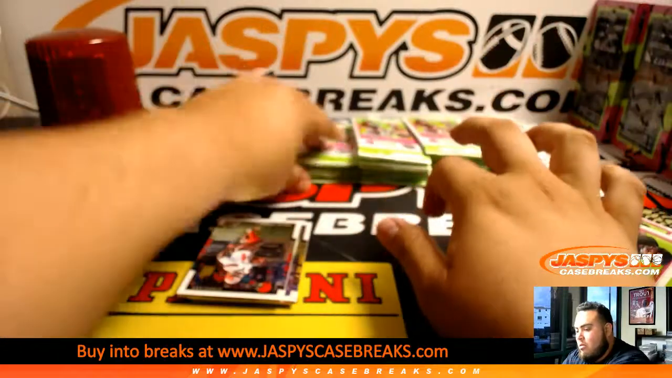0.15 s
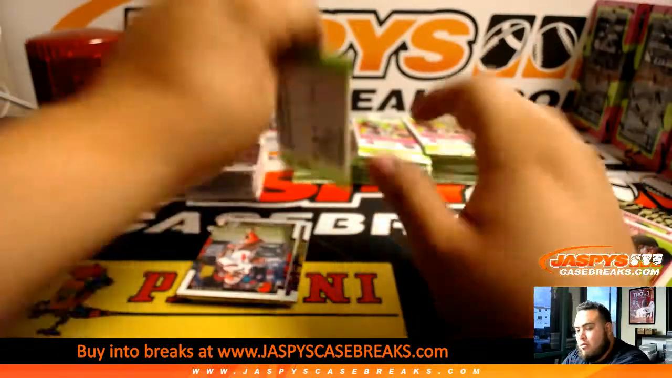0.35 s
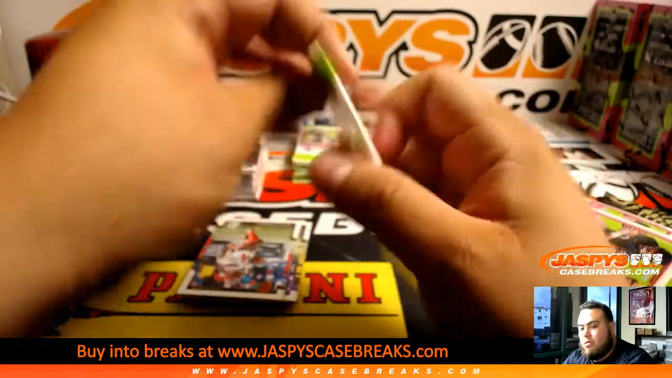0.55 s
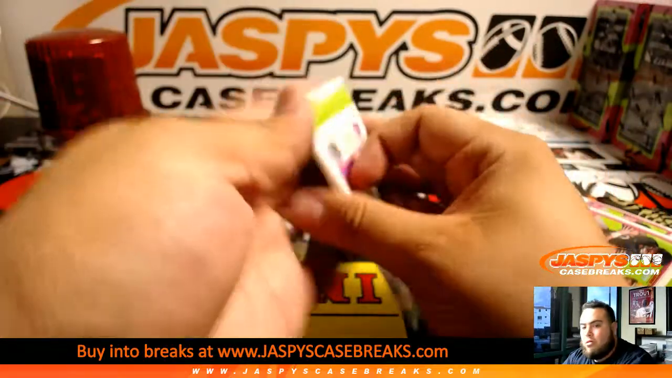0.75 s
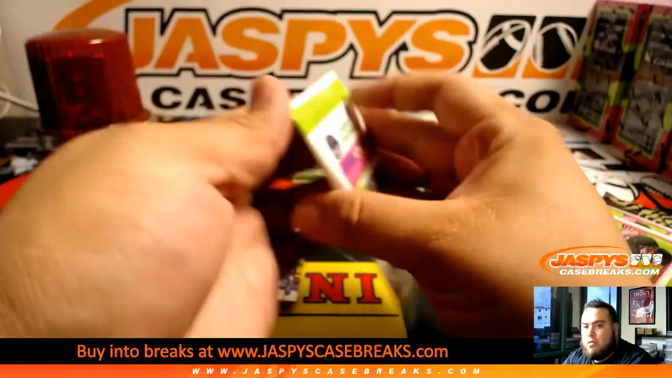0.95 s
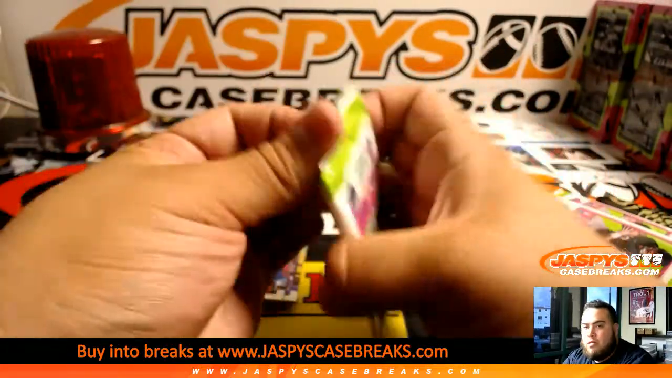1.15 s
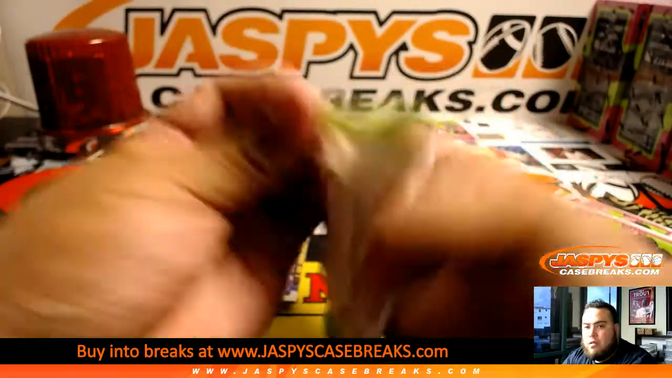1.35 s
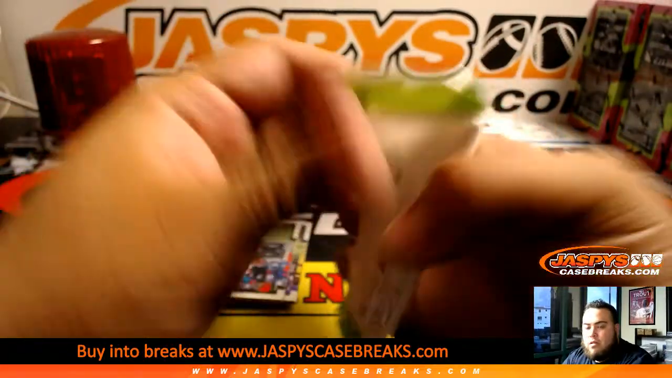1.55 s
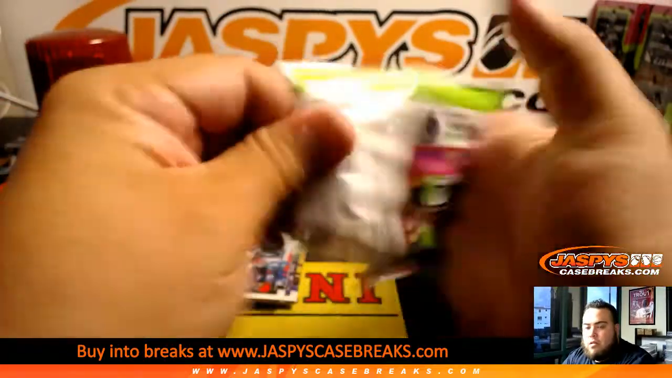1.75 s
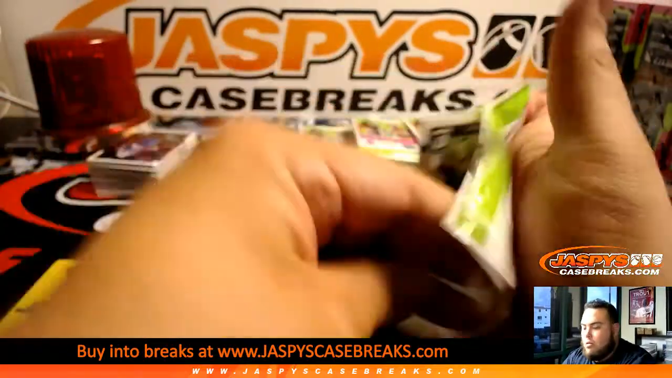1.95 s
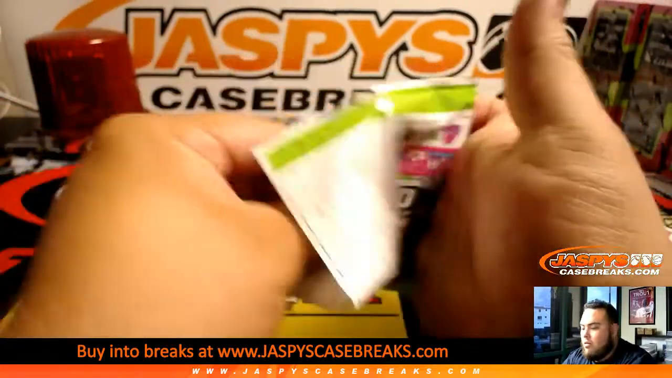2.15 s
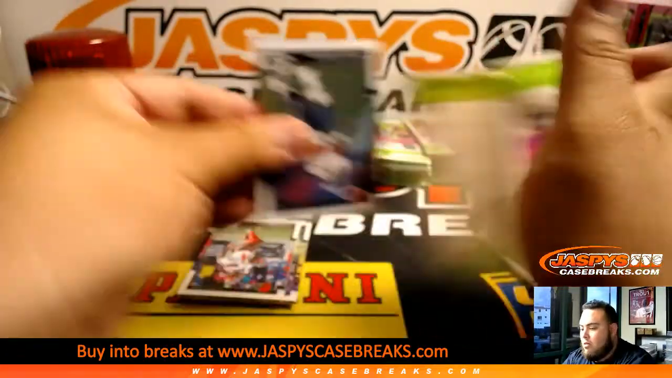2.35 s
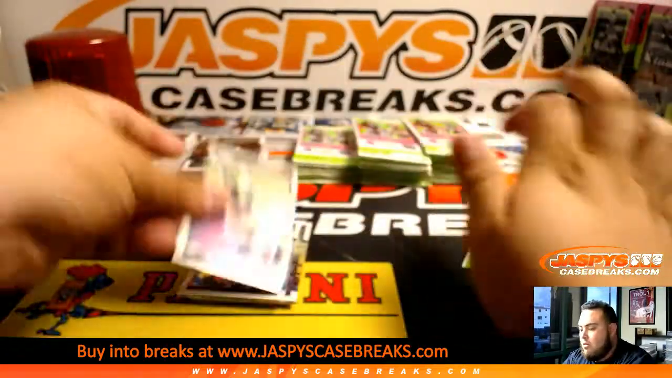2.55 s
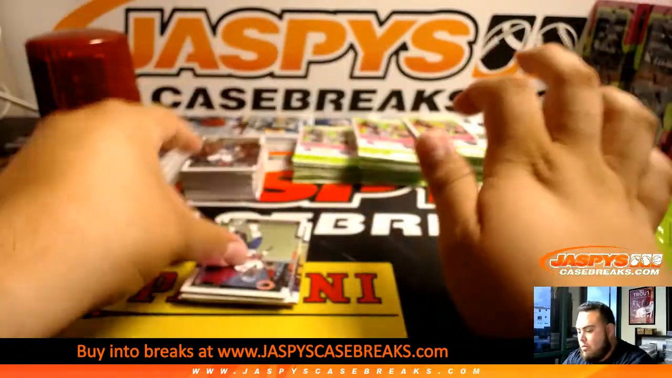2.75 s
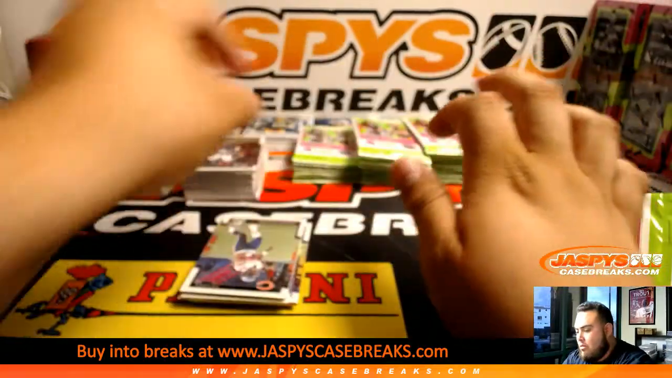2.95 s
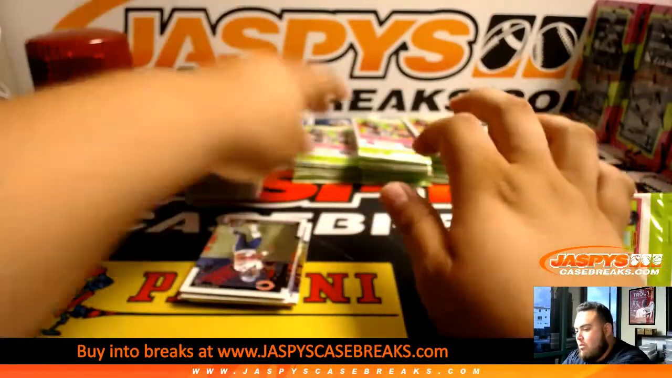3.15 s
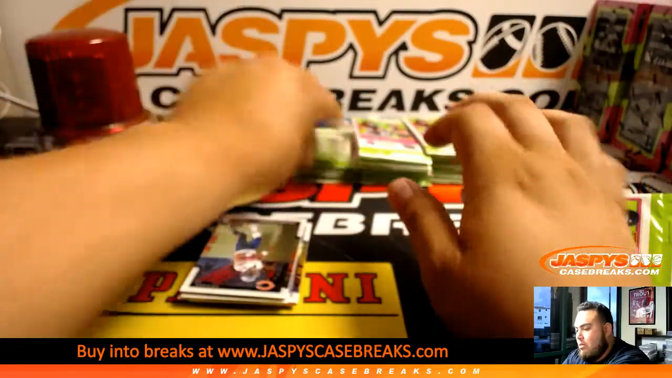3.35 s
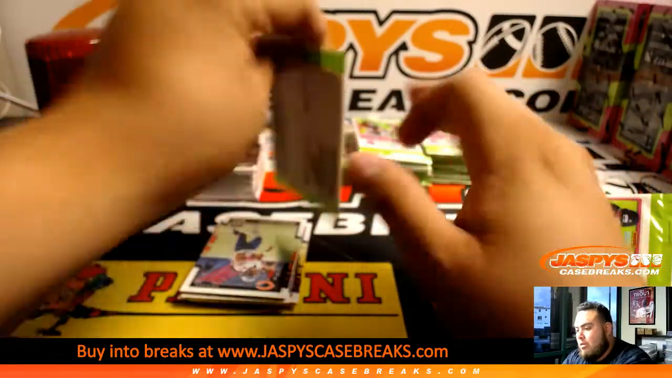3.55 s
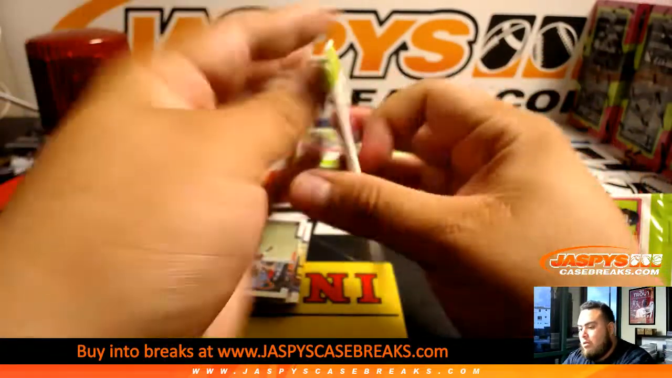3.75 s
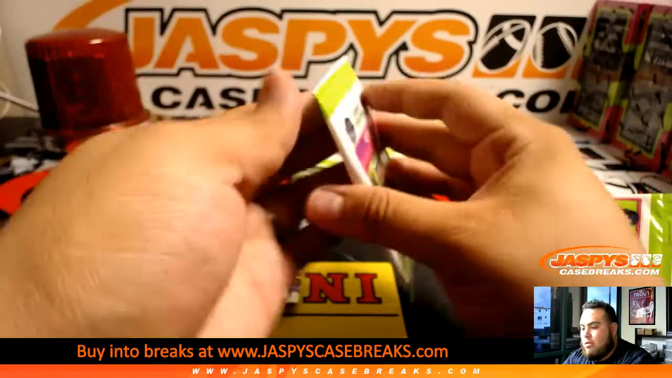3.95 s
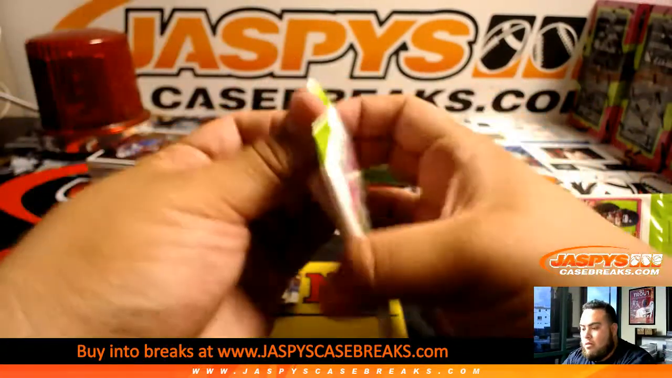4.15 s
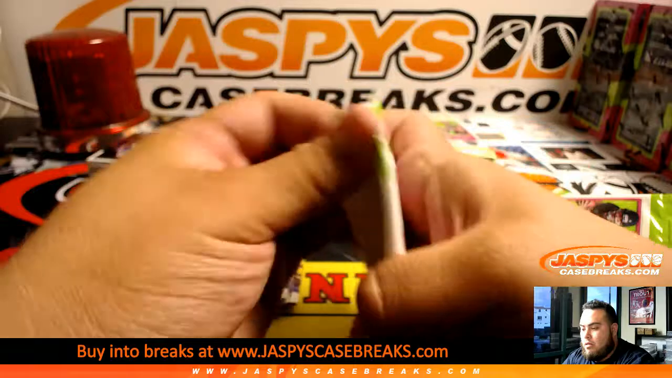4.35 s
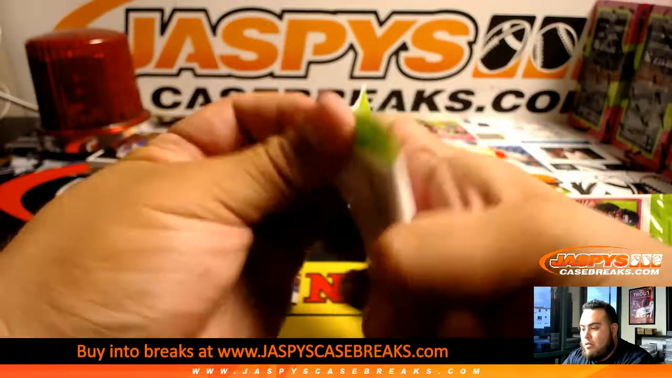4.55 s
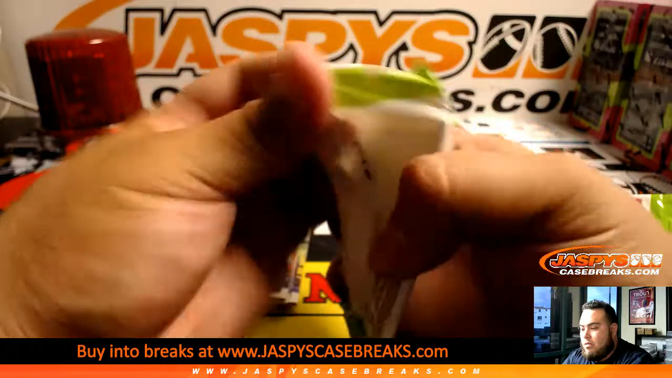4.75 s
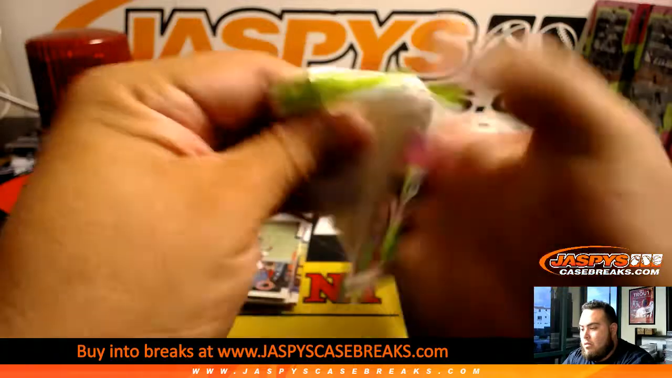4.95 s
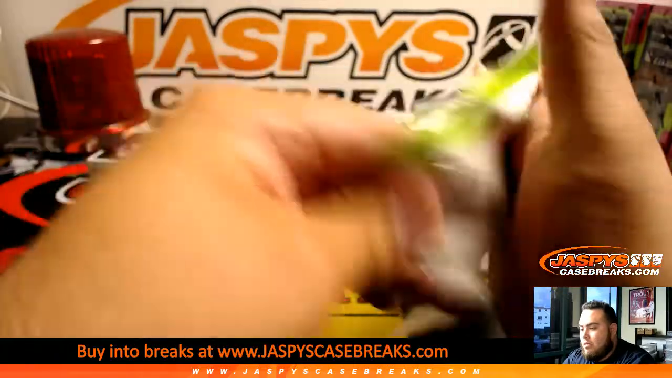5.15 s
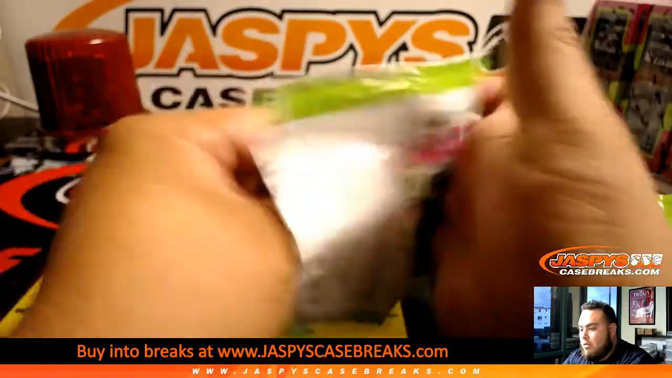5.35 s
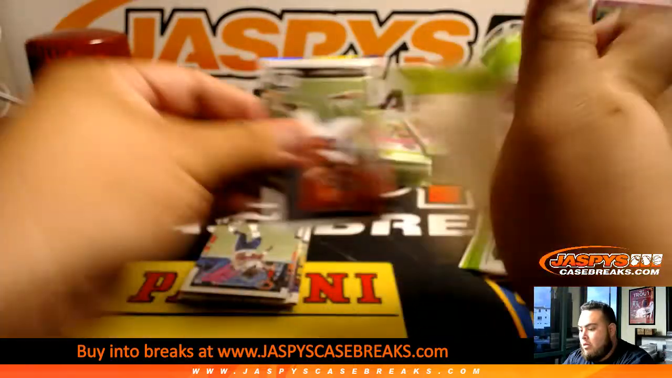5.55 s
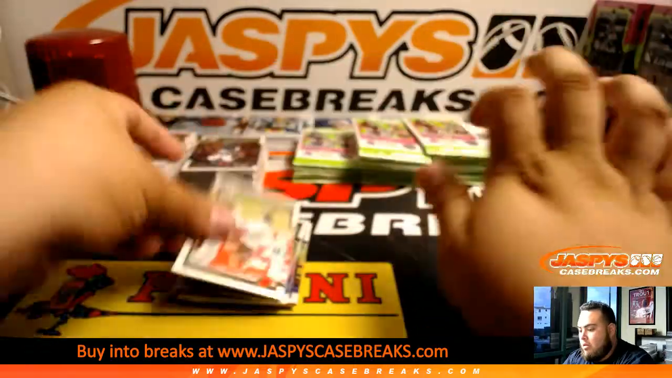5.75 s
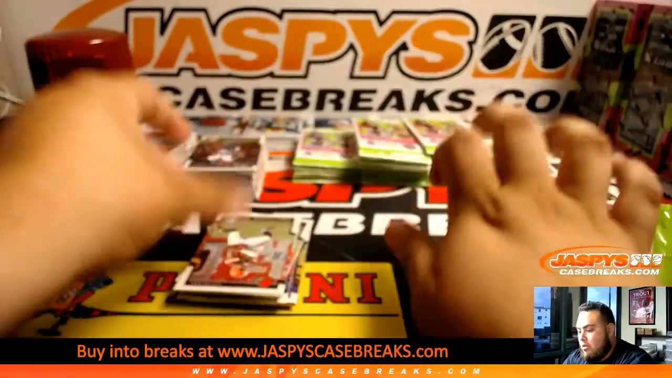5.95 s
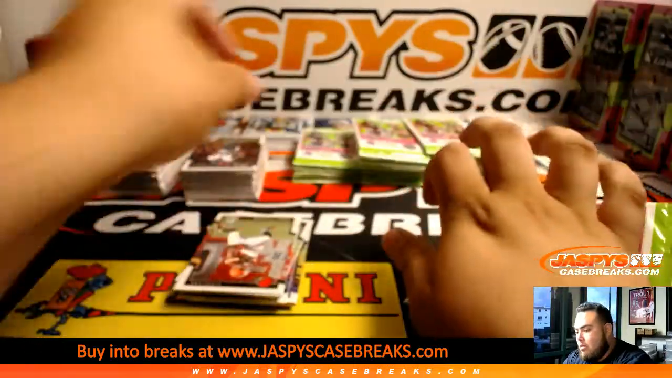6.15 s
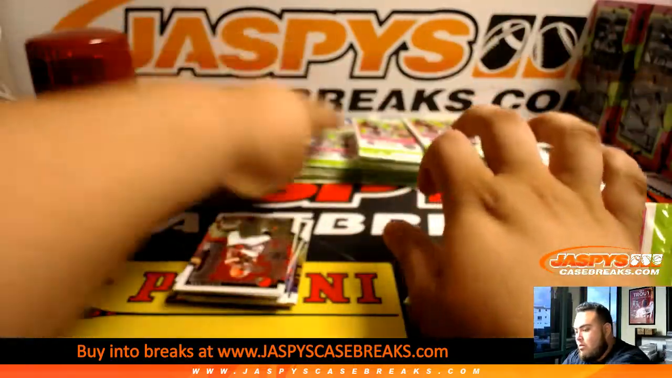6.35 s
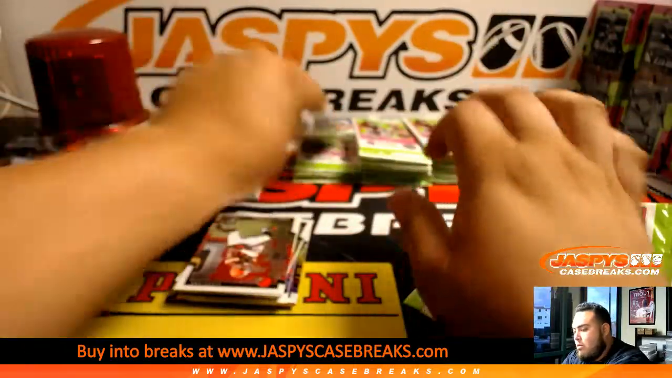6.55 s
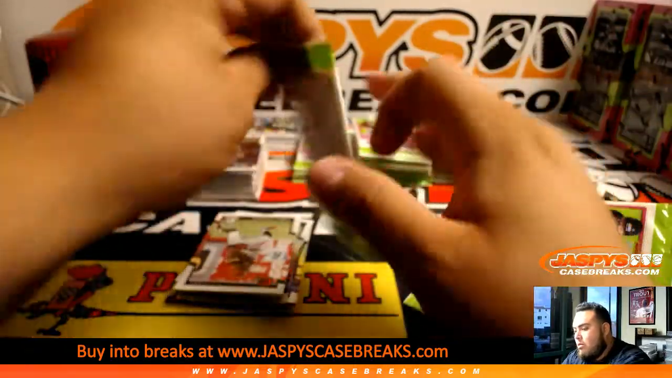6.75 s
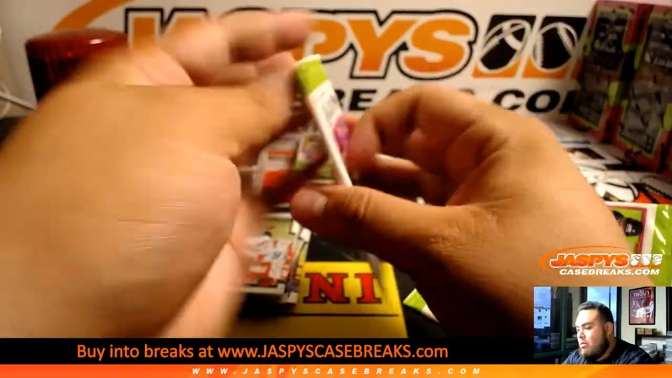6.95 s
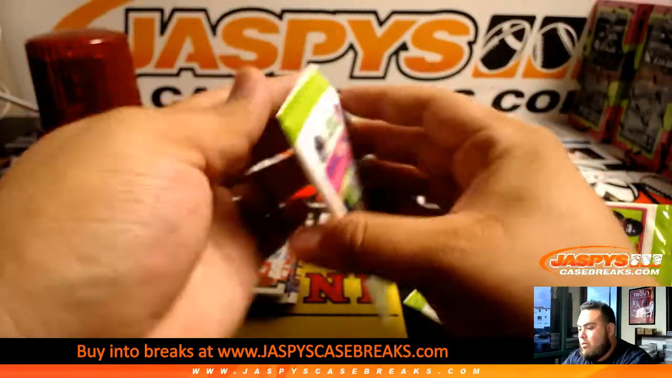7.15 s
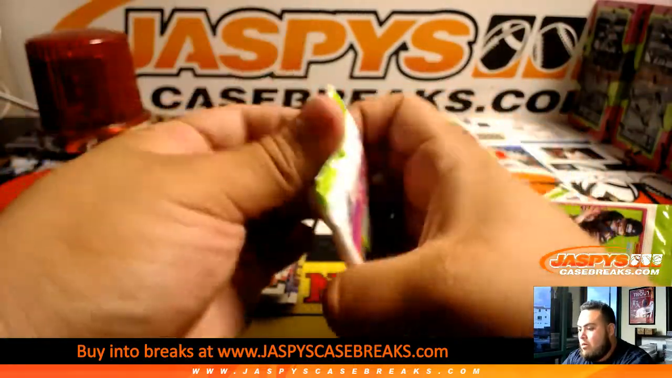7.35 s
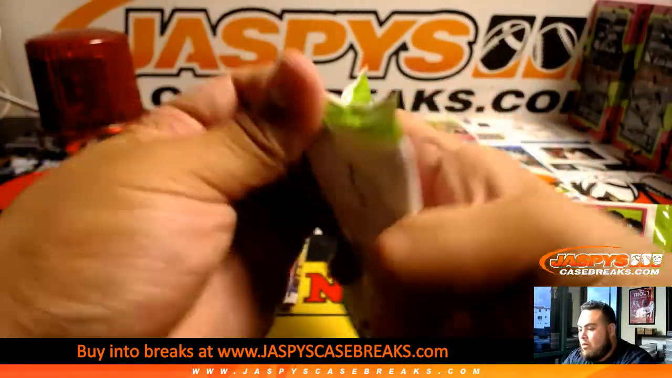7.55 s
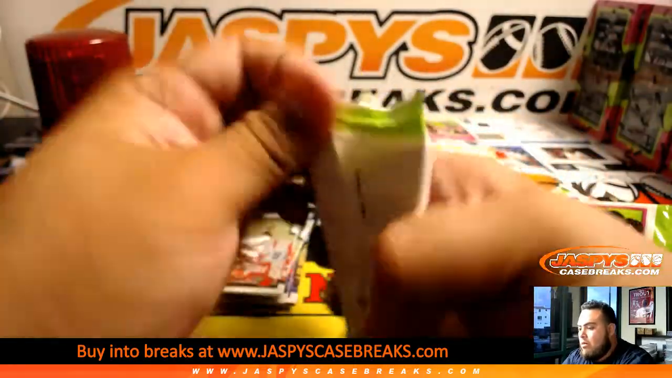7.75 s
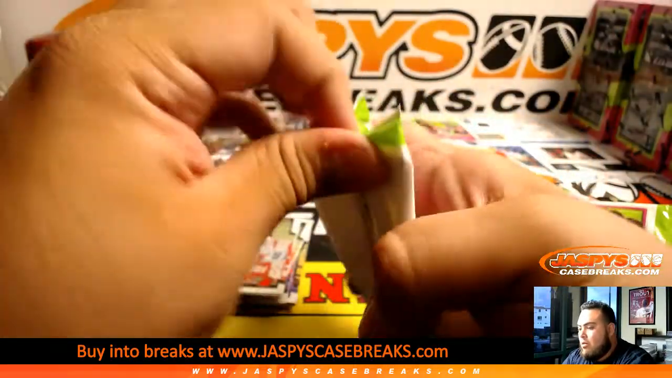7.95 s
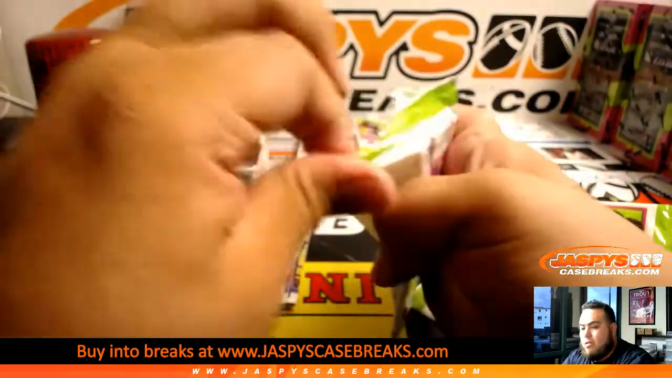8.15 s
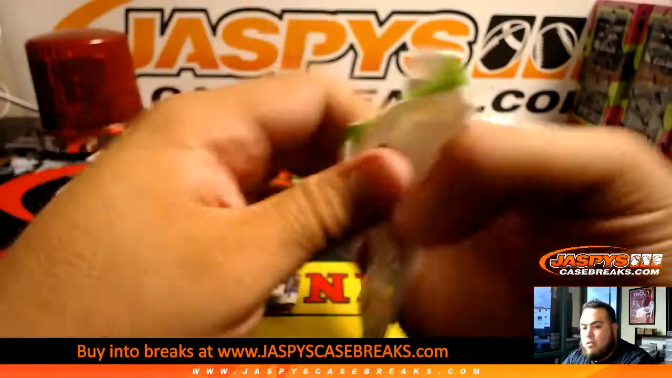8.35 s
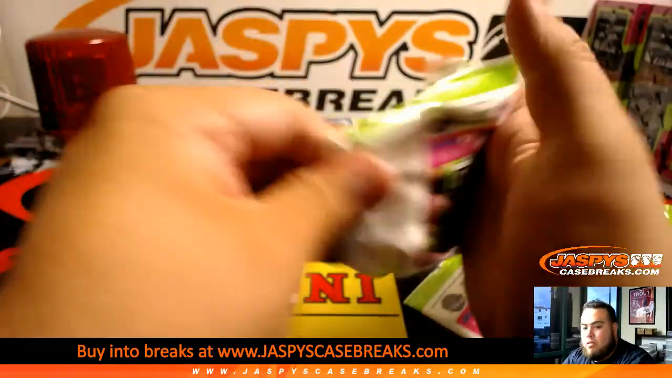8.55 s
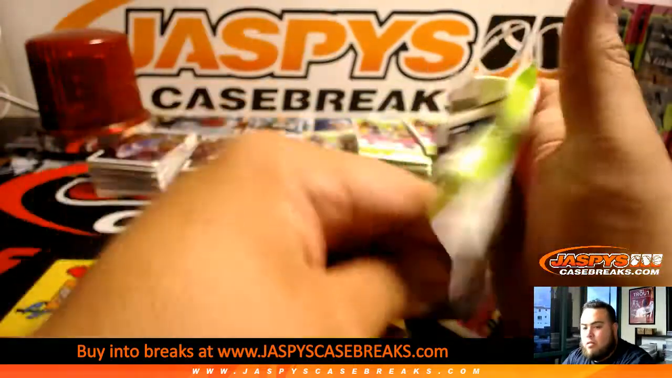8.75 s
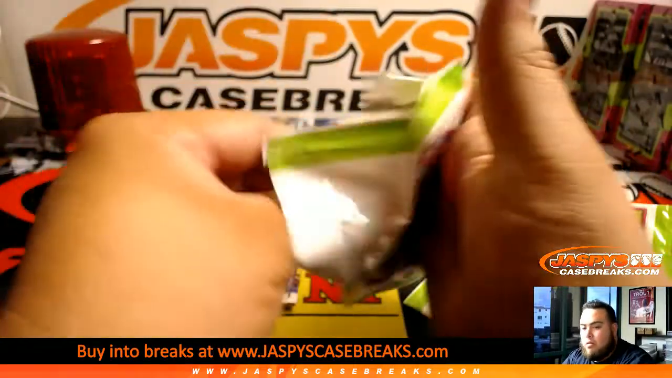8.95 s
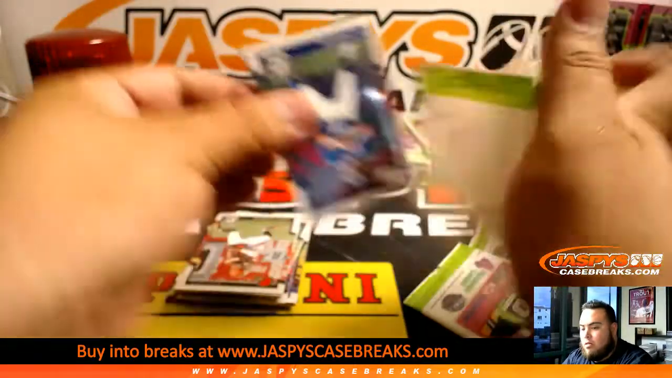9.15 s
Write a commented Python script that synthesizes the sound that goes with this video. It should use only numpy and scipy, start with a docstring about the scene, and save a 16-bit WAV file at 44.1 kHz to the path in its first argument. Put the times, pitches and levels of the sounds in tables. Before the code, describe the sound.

Close to a small microphone in a small room, hands pick up a thin foil packet, crinkle it with bright ticks, then rip it open in short, sharp bursts with hollow pops. Cards land on a pile with a slap and dull thud, then a soft swish. A second packet repeats this; a third is torn open as the stretch ends. Low desk rumble and faint hum lie beneath.

```python
"""Crinkles of foil close to a small microphone, over a low rumble of the desk and a faint room hum.
Three foil packs of trading cards are picked up, crinkled and torn open over a table.
Each buckling crease is shaped noise: a bright crack and the hollow ring of the pouch; a tear is a dense run of them.
Hollow pops are decaying modes; cards slap, thud and swish on a pile after the first two packs, and a small room answers."""
import sys
import numpy as np
from scipy import signal
from scipy.fft import rfft, irfft
from scipy.io import wavfile
from scipy.ndimage import uniform_filter1d

SR = 44100
rng = np.random.default_rng(int(sys.argv[2]) if len(sys.argv) > 2 else 0)


def bounce(signal):
    """Save signal as a 16-bit WAV file at the path given by the first command-line argument."""
    frames = np.transpose(np.atleast_2d(signal))
    limited = np.clip(frames, -1, 1)
    pcm = np.round(limited * 32767).astype(np.int16)
    wavfile.write(sys.argv[1], SR, pcm)


N = 409688
GRAIN = 2048  # samples in one crease sound

# the larger creases that snap: start_s, crack_db, pouch_db, bright_db (all levels relative)
SNAPS = [(.056, -41, -50, -10), (0.0883, -49, -53.5, -14), (0.483, -51.5, -54.5, -10),
         (0.601, -54, -75, -7), (.809, -42, -51, -12), (.848, -45.5, -49.5, -1), (.894, -39, -52, -17),
         (1.013, -32.5, -42, -28), (1.0655, -41, -39.5, -7), (1.147, -43.5, -40.5, -3),
         (1.191, -42.5, -44.5, 1), (1.2109, -23, -26.5, 4), (1.271, -49, -29, -9), (1.361, -36, -35, -19),
         (1.446, -41, -53, -20), (1.542, -29.5, -38, 5), (1.554, -29.5, -37, 8), (1.6306, -21, -14, -7),
         (1.6361, -31, -40, -9), (1.724, -42, -40, -3), (1.76, -28.5, -30, -4), (1.855, -39.5, -43, -30),
         (1.8655, -41, -61, 7), (1.89, -43, -52, -23), (1.9774, -40.5, -36.5, -18), (2.074, -58, -45, -1.5),
         (2.092, -41, -47, -10), (2.112, -40.5, -46, -27), (2.166, -45.5, -51, -2), (2.197, -49, -41, -9),
         (2.26, -42.5, -54.5, -10), (2.277, -47, -56, 6), (2.399, -57, -54.5, -14), (3.178, -49, -54, 4),
         (3.279, -57.5, -66, -15), (3.365, -48, -50.5, -15), (3.392, -46.5, -59, -3), (3.522, -48, -48, 12),
         (3.597, -44, -53, -3), (3.71, -48, -67, -6.5), (3.804, -43.5, -44.5, 0),
         (3.825, -39.5, -51.5, -3.5), (3.845, -39, -41.5, -9), (3.9212, -43, -63, -12),
         (3.941, -37.5, -44.5, 5), (4.047, -33.5, -40, 8.5), (4.09, -33.5, -41, -9.5),
         (4.1844, -47, -58.5, -4), (4.242, -40, -47.5, 4), (4.325, -41.5, -52.5, -1), (4.386, -45, -45, -2),
         (4.401, -43.5, -46.5, -3), (4.4568, -19.5, -26, 5.5), (4.585, -40, -30, -3.5),
         (4.623, -41, -34.5, -4), (4.658, -35, -42.5, -2), (4.672, -25.5, -35, -1.5),
         (4.7641, -38.5, -36.5, -8.5), (4.784, -35, -39, -3), (4.805, -29, -43, 1), (4.841, -24.5, -27, -3),
         (4.8792, -30, -28, 8), (4.9453, -33, -47, 1.5), (4.979, -29.5, -27.5, -5.5),
         (4.9924, -31.5, -37.5, -6), (5.072, -40, -40.5, -9), (5.0984, -39.5, -48, -13),
         (5.2332, -48.5, -39.5, -12.5), (5.3, -47, -45, -1.5), (5.326, -45.5, -52, -6),
         (5.353, -41.5, -43, -6), (5.3842, -41, -42, -15), (5.473, -48, -59, -2.5),
         (5.553, -57.5, -53, 3.5), (6.3365, -51, -66.5, 1), (6.352, -40, -50, 2.5),
         (6.372, -36.5, -52.5, 1), (6.475, -49.5, -51, 0), (6.605, -52.5, -66.5, -4.5),
         (6.6994, -42, -52, -4), (6.729, -45, -59, -9.5), (6.768, -44.5, -60, -4), (6.9034, -44, -53, -7.5),
         (7.0241, -44, -53.5, -5.5), (7.1448, -35.5, -46.5, 2), (7.175, -40.5, -38.5, -4.5),
         (7.201, -38.5, -48, -16), (7.287, -38.5, -39, -7), (7.3141, -37, -51, -9),
         (7.229, -45, -53.5, -12), (7.487, -47, -43.5, 10.5), (7.5761, -47, -39.5, 0),
         (7.606, -40, -39, -5), (7.644, -41.5, -41.5, 2), (7.717, -43.5, -62, -2.5),
         (7.807, -44.5, -61, -0.5), (7.8237, -45, -39.5, -9), (7.848, -39, -40, -9),
         (7.881, -37.5, -39.5, -5), (7.951, -30, -32.5, -12), (7.975, -30, -31.5, 1), (8.045, -44, -36, -5),
         (8.101, -32.5, -39, -7), (8.131, -35.5, -46, -10), (8.183, -37, -38, -9),
         (8.2839, -37.5, -38.5, -4), (8.309, -33.5, -39, -8.5), (8.3358, -25, -26, 1), (8.39, -21, -25, 4),
         (8.4955, -38.5, -37.5, -1), (8.554, -43.5, -38.5, -7), (8.6472, -57, -43, -17),
         (8.656, -45.5, -60, -12.5), (8.705, -50, -43, -17), (8.724, -46, -46, -4),
         (8.8969, -40.5, -37, -14), (8.971, -38.5, -35, 5), (9.06, -43.5, -47, -17)]
# colour of a foil crack, also of a card's edge: pitch_hz, level_db (relative)
CRACK = [(300, -30), (1500, -13.5), (2500, -8), (3700, -9.5), (4500, -1.5), (5300, -2), (6800, -5.5),
         (8400, -5.5), (10000, -10), (11600, -8), (13000, -12), (15500, -13)]


def amp(db):
    """Turns decibels into gain."""
    return 10 ** (np.asarray(db) / 20)


def unit(x):
    """Scales each row to energy 1."""
    return x / np.sqrt(np.sum(x ** 2, -1, keepdims=True) + 1e-20)


def read(points, hz):
    """Reads a table of values against frequency along a log-frequency axis."""
    f, value = np.transpose(points)
    return np.interp(np.log(hz + 1), np.log(f + 1), value)


def add(mix, s, sound):
    """Mixes a sound in at time s, cut off at the end of the mix."""
    part = mix[max(round(s * SR), 0):][:len(sound)]
    part += sound[:len(part)]


def noise(colour):
    """Steady noise of the given spectrum, with rms 1 above 60 Hz."""
    hz = np.fft.rfftfreq(N, 1 / SR)
    spectrum = rfft(rng.standard_normal(N)) * amp(read(colour, hz))
    return irfft(spectrum, N) / irfft(spectrum * (hz > 60), N).std()


def sway(hz=15.5, width_hz=5, edge_hz=24):
    """The microphone rocks with the desk as the arms move: noise through a narrow, very low resonance."""
    # swaying of the desk: start_s, level_db
    sway_points = [(0, -39), (.45, -51), (.82, -32), (1.1, -48.5), (1.35, -41), (2.3, -37), (3.45, -46),
                   (3.8, -33), (4.3, -52), (4.55, -36.5), (5.1, -39.5), (5.6, -49), (6.301, -40),
                   (6.7, -48.5), (7.1, -37.5), (7.8, -49), (8.05, -34), (9.29, -44)]
    f = np.fft.rfftfreq(N, 1 / SR)
    resonance = f / (hz ** 2 - f ** 2 + 1j * f * width_hz)
    rolloff = 1 + (f / edge_hz) ** 3
    rocking = irfft(rfft(rng.standard_normal(N)) * resonance / rolloff, N)
    level_db = np.interp(np.arange(N) / SR, *np.transpose(sway_points))
    return rocking / rocking.std() * amp(level_db)


def hum(level_db=-59):
    """The room's low hum: steady noise, strongest in the bass."""
    # colour of the hum: pitch_hz, level_db (relative)
    hum_colour = [(20, -16.5), (35, -18), (55, -21.5), (85, -19), (140, -21), (220, -24.5), (270, -23.5),
                  (420, -29), (780, -41), (1250, -46.5), (1500, -55), (2400, -50), (5000, -70),
                  (16000, -69)]
    return amp(level_db) * noise(hum_colour)


def slips(count, rise_s, fall_s, after, after_s):
    """A surface gives way in a brief flurry of noise, then shivers more slowly."""
    t = np.arange(GRAIN) / SR
    decay = np.exp(-t / fall_s) + after * np.exp(-t / after_s)
    envelope = (1 - np.exp(-t / rise_s)) ** 2 * decay
    return rng.standard_normal((count, GRAIN)) * envelope


def ring(push, colour_db):
    """A causal, minimum-phase filter halves each row's broad bumps in dB and adds the colour; energy 1."""
    broad_db = 10 * np.log10(uniform_filter1d(abs(rfft(push)) ** 2, size=31) + 1e-9)
    cepstrum = irfft(np.log(amp(colour_db - .5 * broad_db)))
    # fold the cepstrum onto positive time, so nothing sounds before the push
    cepstrum[:, 1:GRAIN // 2] *= 2
    cepstrum[:, GRAIN // 2 + 1:] = 0
    return unit(irfft(rfft(push) * np.exp(rfft(cepstrum))))


def humps(resonances, hz):
    """Fixed resonances as bumps in dB."""
    return sum(db / (1 + (2 * (hz - f) / width) ** 2) for f, width, db in resonances)


def facets(count, spread_db, order):
    """Every facet of foil has its own uneven set of resonances: smooth random ripples in dB."""
    echoes = rng.standard_normal((count, order, 2)) @ [1, 1j]
    ripples = irfft(echoes, GRAIN)[:, :GRAIN // 2 + 1]
    return spread_db * np.tanh(ripples / ripples.std(1, keepdims=True))


def crease(count, low_hz, high_hz, boost_db, octaves):
    """Each crease has a main resonance at a pitch of its own: a bump in dB."""
    hz = np.fft.rfftfreq(GRAIN, 1 / SR)
    ring_hz = low_hz * (high_hz / low_hz) ** rng.random((count, 1))
    return boost_db / (1 + (np.log2((hz + 1) / ring_hz) / octaves) ** 2)


def cracks(bright_db):
    """The sharp, bright part of a crease: a sub-millisecond slip rings one facet of foil."""
    # resonances of the foil: pitch_hz, width_hz, boost_db
    foil = [(3232, 250, 6), (4550, 37, 3), (5120, 130, 3), (5770, 100, 3), (7750, 96, 4.5),
            (8550, 100, 4.5)]
    count, hz = len(bright_db), np.fft.rfftfreq(GRAIN, 1 / SR)
    # brightness lifts or lowers the treble from about 7.8 kHz up
    top = 1 / (1 + (7800 / (hz + 1)) ** 6)
    treble_db = (bright_db[:, None] + 3.0) * top
    colour = read(CRACK, hz) + humps(foil, hz) + treble_db + facets(count, spread_db=6, order=30)
    return ring(slips(count, rise_s=.0003, fall_s=.0003, after=.05, after_s=.0038), colour)


def pouches(count):
    """The hollow part of a crease: the pouch rings for a few milliseconds."""
    # colour of the pouch: pitch_hz, level_db (relative)
    pouch_colour = [(60, -24.5), (150, -22.5), (260, -7), (400, -7), (600, -9), (1200, -5), (1600, -7.5),
                    (2200, -10), (2800, -15), (6000, -30.5)]
    # resonances of the pouch, the cupped hands and the desk: pitch_hz, width_hz, boost_db
    hollow = [(490, 100, 3), (708.6, 55, 6), (863, 55, 3), (1156, 78, 5.5), (1261.3, 62, 5), (1905, 51, 3),
              (2057, 55, 7), (2263, 43, 7.5)]
    hz = np.fft.rfftfreq(GRAIN, 1 / SR)
    own_pitch_db = crease(count, low_hz=617, high_hz=2200, boost_db=10.5, octaves=0.15)
    colour = read(pouch_colour, hz) + humps(hollow, hz) + own_pitch_db
    return ring(slips(count, rise_s=0.00037, fall_s=0.00055, after=0.96, after_s=0.0046), colour)


def snaps(crack_trim_db=2.0, pouch_trim_db=1.5):
    """The large creases, one by one, each a crack together with a ring of the pouch."""
    start_s, crack_db, pouch_db, bright_db = np.transpose(SNAPS)
    sounds = amp(crack_db + crack_trim_db)[:, None] * cracks(bright_db)
    sounds += amp(pouch_db + pouch_trim_db)[:, None] * pouches(len(start_s))
    out = np.zeros(N)
    for at, sound in zip(start_s, sounds):
        add(out, at, sound)
    # energy 1 becomes the energy of 4 ms at power 1
    return out * np.sqrt(.004 * SR)


def stroke(t, start, length, crack_db, pouch_db, rise_db_per_s, fall_db_per_s):
    """Power of crack and pouch under one stroke that builds up, holds and dies down."""
    before_db = rise_db_per_s * np.maximum(start - t, 0)
    after_db = fall_db_per_s * np.maximum(t - start - length, 0)
    slack_db = np.minimum(before_db + after_db, 100)
    return np.outer(amp([crack_db, pouch_db]), amp(-slack_db)) ** 2


def handling():
    """Relative crack and pouch levels in dB: powers of hold, bends, tears and crowds around snaps, summed."""
    # each pack's steady rustle peaks as it opens, eases to a light one, then fades to rest:
    # picked_up_s, opened_s, eased_s
    packs = [(.55, 1.35, 1.5), (3.2, 4.6, 5.78), (6.4, 7.9, 9.25)]
    # rustle in the hands, one row per grip (rest, light, firm): crack_db, pouch_db (relative)
    grips = (-82.5, -75), (-70, -66), (-56, -54)
    reach_s = 0.206  # the steady rustle rises from rest, or fades back to it, over this time
    # the fingers bend the foil in short flurries: start_s, length_s, crack_db, pouch_db (relative)
    bend_rows = [(.03, .05, -60, -61), (.17, 0.027, -67, -66), (.37, 0.11, -68, -69),
                 (.625, 0.019, -60, -59), (.69, 0.032, -54, -55), (.86, 0.058, -54.5, -64),
                 (1.003, 0.0033, -33, -54), (1.148, 0.0053, -48, -58), (1.37, .04, -42, -38.5),
                 (1.435, 0.019, -46, -51), (1.529, .01, -45.5, -51.5), (1.765, 0.024, -44.5, -41),
                 (1.885, 0.021, -52.5, -48), (1.978, 0.0084, -48.5, -44), (2.085, 0.047, -44.5, -44.5),
                 (2.245, 0.022, -53.5, -53), (2.385, 0.018, -62, -62.5), (3.27, .035, -60, -64),
                 (3.35, 0.031, -57.5, -60), (3.51, 0.025, -53.5, -51.5), (3.6, .01, -74.5, -63),
                 (3.72, 0.016, -53.5, -59.5), (3.812, 0.011, -46, -51.5), (3.945, 0.021, -49, -66),
                 (4.04, 0.022, -42, -47.5), (4.645, 0.03, -41.5, -41), (4.985, 0.011, -44, -40),
                 (5.09, 0.019, -64, -56), (5.29, .11, -54, -54.5), (6.29, 0.047, -71.5, -72),
                 (6.36, 0.022, -55, -58), (6.55, 0.012, -62, -65), (6.715, 0.082, -55.5, -55.5),
                 (6.9, .012, -47, -58), (7.07, .02, -50, -50), (7.142, 0.05, -47, -49),
                 (7.275, 0.032, -44.5, -44.5), (7.38, 0.058, -45, -43.5), (7.635, 0.02, -44, -44),
                 (7.823, 0.042, -51.5, -47), (8.09, 0.088, -49, -46.5), (8.53, .025, -49, -55),
                 (8.635, 0.018, -53, -46.5), (8.728, 0.029, -49, -48.5), (8.9, 0.073, -46.5, -43.5),
                 (9.09, .05, -56, -61)]
    # the foil tears in surges: start_s, length_s, crack_db, pouch_db (relative), build_up_db_per_s
    tear_rows = [(1.214, 0.044, -32.5, -32.5, 2500), (1.587, 0.061, -28, -28, 480),
                 (1.632, 0.0092, -29, -24, 4001), (4.462, .018, -28.5, -30, 2500.5),
                 (4.826, 0.043, -28.5, -28.5, 560), (4.874, 0.0078, -29, -24, 1499),
                 (7.944, .032, -30, -30.5, 1100), (8.33, 0.00883, -26.5, -27, 622),
                 (8.355, .02, -33.5, -35.5, 1000), (8.381, 0.011, -29, -23.5, 3000)]
    t = np.arange(0, N, 32) / SR
    bends = sum(stroke(t, *row, rise_db_per_s=600, fall_db_per_s=247) for row in bend_rows)
    tears = sum(stroke(t, *row, fall_db_per_s=320) for row in tear_rows)
    # small creases crowd around each snap, 15 dB under its table levels
    crowds = sum(stroke(t, s, 0, crack_db - 15, pouch_db - 15, rise_db_per_s=2200.5, fall_db_per_s=499.5)
                 for s, crack_db, pouch_db, _ in SNAPS)
    when = np.ravel([(up - reach_s, up, opened, eased, eased + reach_s) for up, opened, eased in packs])
    hold_db = [np.interp(t, when, [rest, light, firm, light, rest] * len(packs))
               for rest, light, firm in zip(*grips)]
    powers = amp(hold_db) ** 2 + bends + tears + crowds
    return [np.interp(np.arange(N) / SR, t, 10 * np.log10(power)) for power in powers]


def crinkle(crowding=.7, crack_trim_db=-1, pouch_trim_db=-2.5, bright_db=-4, count=200):
    """Tiny creases come at random; the harder the pull, the faster, until they merge into a rip."""
    per_s, variety_db = 340, 3.5  # base rate of creases, and their spread in balance and brightness
    facet_s = .009  # the fold moves on to a new facet this often, so the colour keeps shifting
    crack_db, pouch_db = handling()
    effort_db = np.maximum(crack_db, pouch_db)
    # a light touch rubs evenly, bending gives separate ticks, a hard pull runs together
    hard_db = crowding * np.maximum(effort_db + 48, 0)
    light_db = np.clip(-58 - effort_db, 0, 10)
    rate = per_s * amp(hard_db + light_db)
    spread_db = np.interp(effort_db, [-68, -57, -42, -28], [2, 6.5, 6.5, 4])
    at = np.flatnonzero(rng.random(N) < rate / SR)
    chance = np.clip(rng.standard_normal((len(at), 2)), -2, 2)
    # some creases crack more, some ring more
    balance_db = np.outer([0, variety_db], chance[:, 1])
    size = np.zeros((2, N))
    size[:, at] = amp(spread_db[at] * chance[:, 0] + balance_db)
    # creases within about 30 ms share the work of the hand
    size /= np.sqrt(abs(uniform_filter1d(size ** 2, size=1300)) + 1e-5)
    bright = cracks(bright_db + variety_db * rng.standard_normal(count))
    hollow = pouches(count)
    crack_gain = size[0] * amp(crack_db + crack_trim_db)
    pouch_gain = size[1] * amp(pouch_db + pouch_trim_db)
    # each crease falls on the current facet or the next
    facet = ((at / SR / facet_s).astype(int) + rng.integers(0, 2, len(at))) % count
    out = np.zeros(N)
    for i, k in zip(at, facet):
        add(out, i / SR, crack_gain[i] * bright[k] + pouch_gain[i] * hollow[k])
    return out


def knocks(rows, cycles, upper_db):
    """Blunt pushes: a low mode and two weaker ones above it, each dying away within a few cycles."""
    t, out = np.arange(GRAIN * 2) / SR, np.zeros(N)
    for s, db, hz in rows:
        turns = np.outer([1, 1.55, 2.4], hz * t)
        modes = np.sin(2 * np.pi * turns) * np.exp(-turns / cycles) * (1 - np.exp(-turns / 0.17))
        knock = modes[0] - amp(upper_db) * modes[1] + amp(2 * upper_db) * modes[2]
        add(out, s, amp(db + 8.5) * knock)
    return out


def pops():
    """The pouch flexes or bursts open: short, hollow knocks with strong upper modes."""
    # pops of the pouch: start_s, level_db (relative), pitch_hz
    pop_rows = [(1.213, -39.5, 259), (1.388, -38.5, 398), (1.6304, -22, 850), (1.6345, -24, 303),
                (1.975, -38.5, 377.3), (2.036, -43, 466), (2.095, -38, 300), (4.457, -39, 238.2),
                (4.878, -18, 649), (4.882, -33.5, 228), (7.975, -47, 310.8), (8.383, -30, 250),
                (8.390, -20.5, 500.8), (8.553, -37.5, 341.5), (8.727, -40, 342.7)]
    return knocks(pop_rows, cycles=1.143, upper_db=-2.0)


def cards(slap_trim_db=23):
    """Cards land with a slap and a dull thud of the desk, and slide over the pile with a soft swish of noise."""
    # cards landing on the pile: start_s, thud_db (relative), pitch_hz, slap_db (relative)
    thuds = np.array([(2.456, -44.5, 236, -49.5), (2.542, -35, 128, -37), (2.561, -36, 190, -55.5),
                      (2.59, -45.5, 223, -58.5), (5.602, -41, 259.4, -52.5), (5.701, -33, 125.8, -44.5),
                      (5.722, -34, 181, -64), (5.752, -51.5, 218.8, -60.5)])
    # a card sliding over the pile: start_s, end_s, swish_db, edge_hiss_db
    slides = [(2.509, 2.548, -52, -74), (2.6, 2.828, -62, -61.5), (5.873, 5.99, -60.5, -62.5)]
    # colour of card stock: pitch_hz, level_db (relative)
    card_stock = [(100, 2), (500, 14.5), (1300, 6.5), (2400, 2.5), (5000, -12.5), (15000, -27)]
    out = knocks(thuds[:, :3], cycles=0.68, upper_db=-8)
    colour = read(card_stock, np.fft.rfftfreq(GRAIN, 1 / SR))[None]
    slaps = ring(slips(len(thuds), rise_s=.0003, fall_s=.0025, after=.14, after_s=.012), colour)
    for (s, _, _, db), slap in zip(thuds, slaps):
        add(out, s, amp(db + slap_trim_db) * slap)
    rub, edge = noise(card_stock), noise(CRACK)
    for start, end, swish_db, edge_db in slides:
        span = np.arange(round(start * SR), round(end * SR))
        speed = abs(np.sin(np.pi * np.linspace(0, 1, len(span)) ** 2.4))  # speeds up, then stops
        swish = amp(swish_db) * rub[span] * speed
        hiss = amp(edge_db) * edge[span] * speed ** 6
        add(out, start, swish + hiss)
    return out


def room(x, early_db=-14, tail_db=-12.5, warmth_db=3):
    """Quick echoes off the desk and hands, then a short, warm tail whose top treble dies first."""
    # decay of the room: pitch_hz, t60_s
    decay = [(200, .4), (1000, 0.22), (5000, 0.27), (15000, 0.13)]
    t = np.arange(SR // 2) / SR
    sparse = rng.standard_normal(len(t)) * (rng.random(len(t)) < .04)
    early = sparse * (t > .002) * np.exp(-t / .01)
    taps = rng.choice([-1., 1.], len(t)) * (rng.random(len(t)) < .15) * (t > .005)
    hz, when, z = signal.stft(taps, SR, nperseg=256)
    warm_db = warmth_db / (1 + (hz[:, None] / 2000) ** 2)
    fade_db = warm_db - 60 * when / read(decay, hz)[:, None]
    tail = signal.istft(z * amp(fade_db), SR, nperseg=256)[1][:len(t)]
    response = amp(early_db) * unit(early) + amp(tail_db) * unit(tail)
    return x + signal.fftconvolve(x, response)[:N]


def scene():
    """Foil and cards in the room, over its hum and the sway of the desk."""
    hands = snaps() + crinkle() + pops() + cards()
    return (room(hands) + hum() + sway())[None]


def record(dry, edge_hz=15700):
    """The recorder's band limit: a steep low-pass."""
    lowpass = signal.firwin(255, edge_hz, window=("kaiser", 9), fs=SR)
    return signal.oaconvolve(dry, lowpass[None], "same")


dry = scene()
out = record(dry)
bounce(out)
```